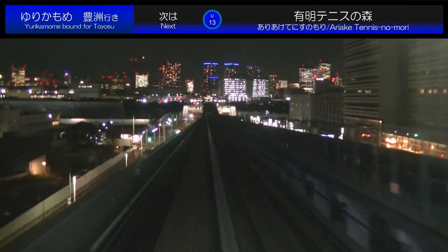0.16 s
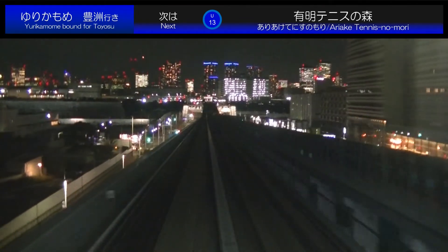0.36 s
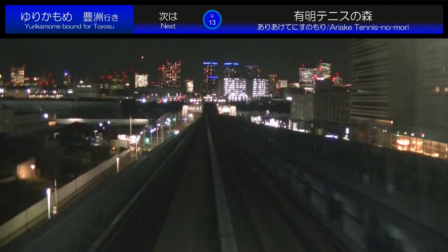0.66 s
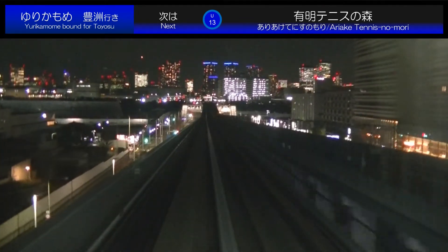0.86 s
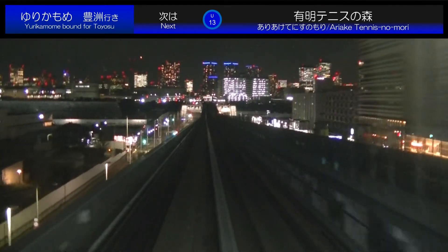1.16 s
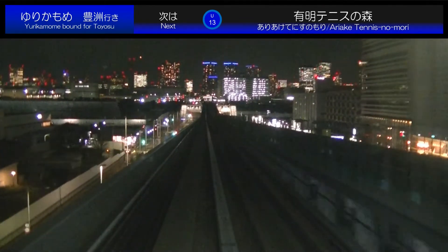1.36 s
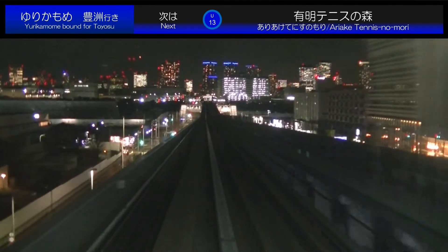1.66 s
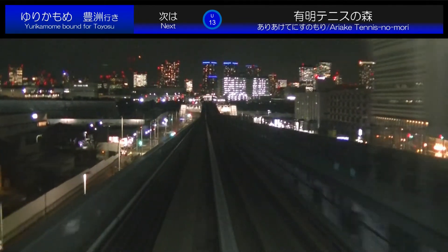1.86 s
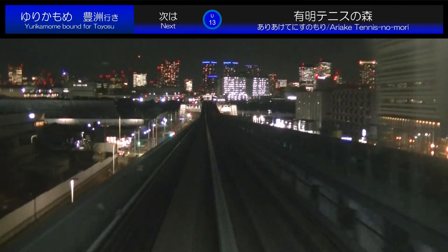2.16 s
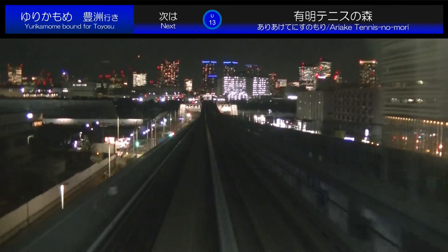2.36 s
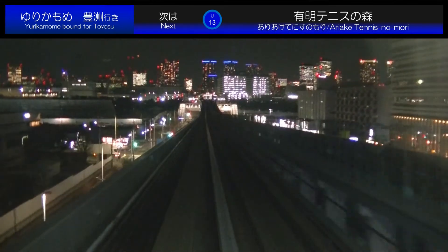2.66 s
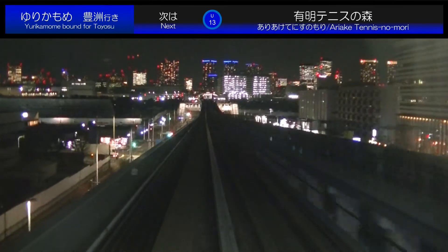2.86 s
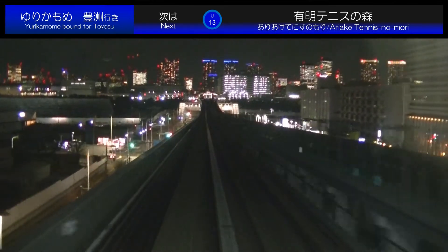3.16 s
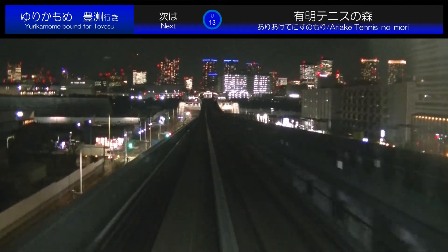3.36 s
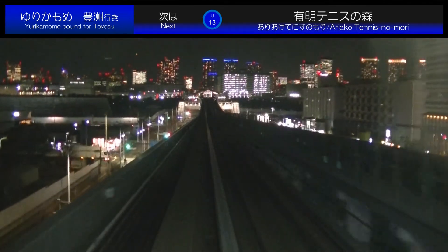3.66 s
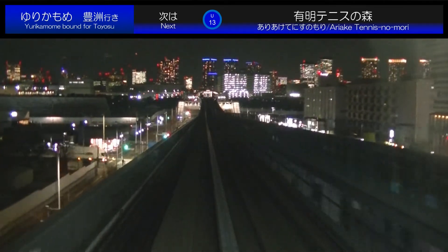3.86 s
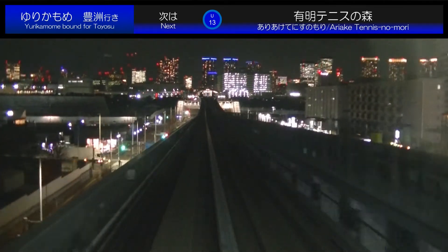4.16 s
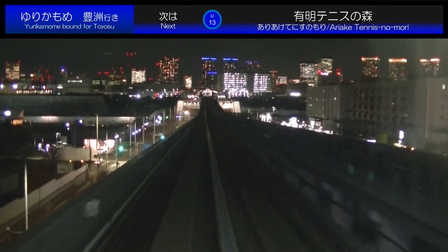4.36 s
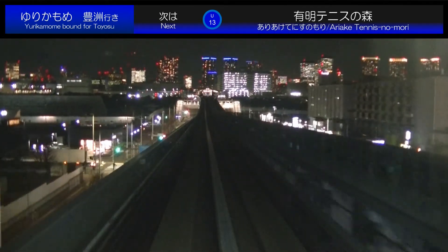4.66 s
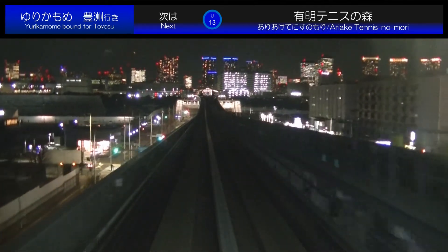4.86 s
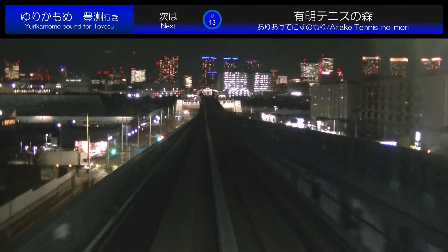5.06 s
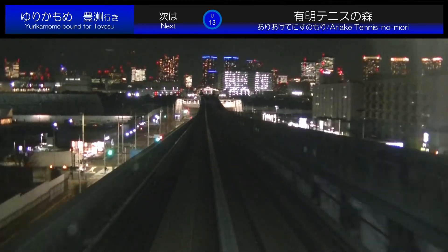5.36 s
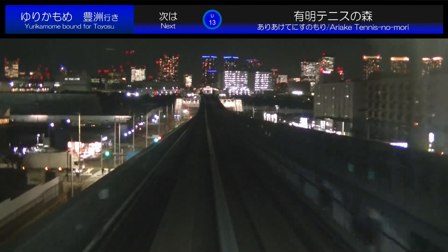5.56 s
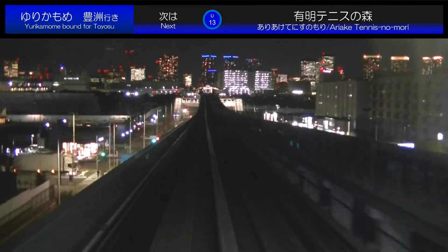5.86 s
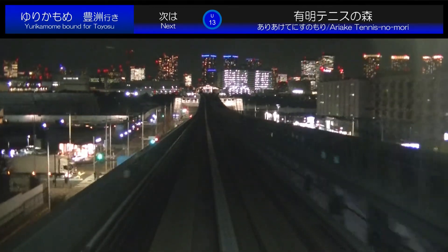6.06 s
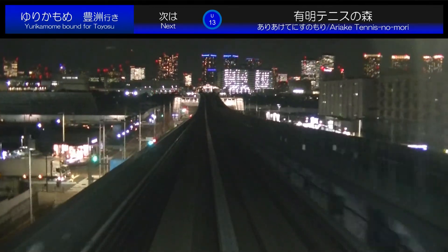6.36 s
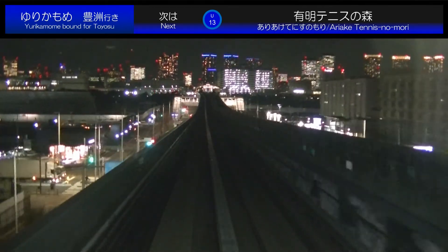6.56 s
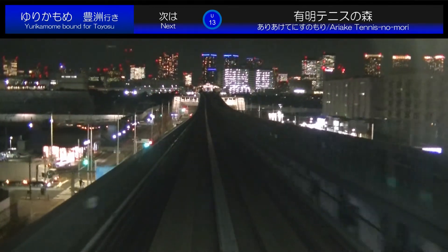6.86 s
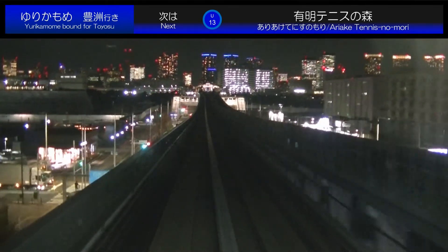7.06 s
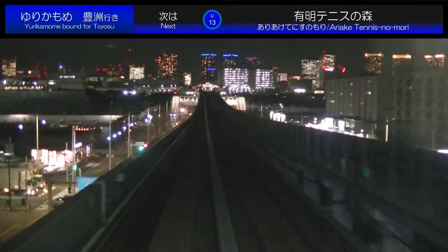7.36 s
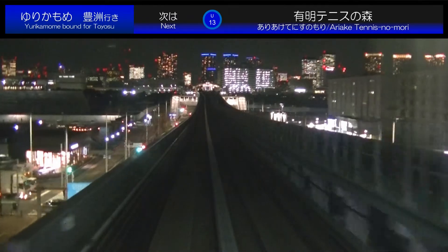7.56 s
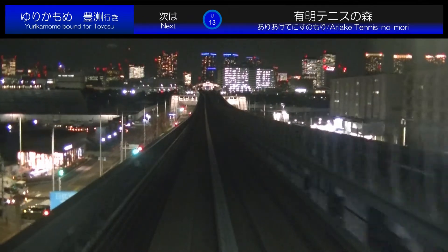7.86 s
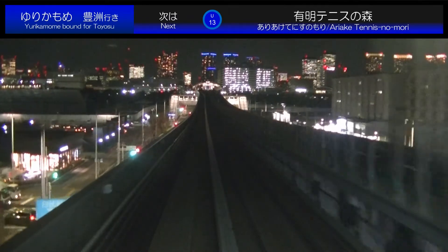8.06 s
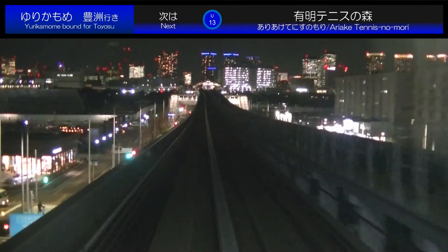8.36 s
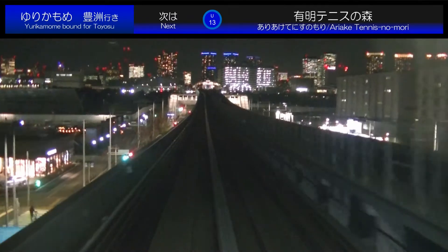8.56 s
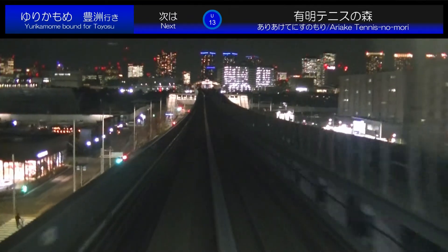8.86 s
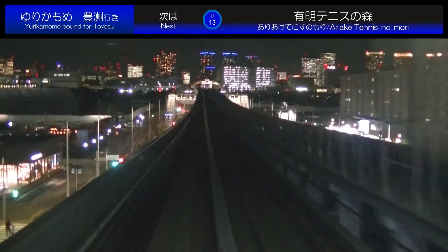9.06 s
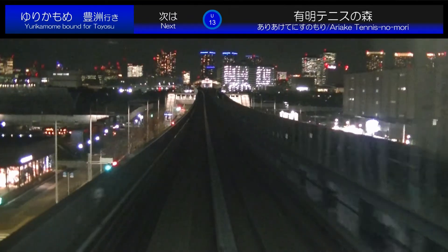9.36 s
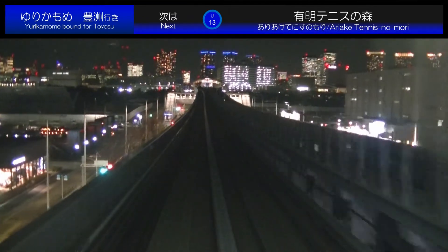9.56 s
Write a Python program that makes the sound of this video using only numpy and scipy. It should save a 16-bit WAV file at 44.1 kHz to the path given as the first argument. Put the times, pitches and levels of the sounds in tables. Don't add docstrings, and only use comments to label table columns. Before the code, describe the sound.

Inside a rubber-tyred train at cruising speed, a wavering mid-pitched gear whine rides over booming, roaring tyre noise, with a dull slab thud.

```python
import sys
import numpy as np
from scipy import signal
from scipy.io import wavfile
from scipy.ndimage import uniform_filter1d

SR = 44100
rng = np.random.default_rng(int(sys.argv[2]) if len(sys.argv) > 2 else 0)


def dump(signal):
    limited = np.clip(np.atleast_2d(signal).T, -1, 1)
    pcm = np.round(limited * 32767).astype(np.int16)
    wavfile.write(sys.argv[1], SR, pcm)


def level_to_linear(level):
    exponent = np.asarray(level, float) / 20
    return 10 ** exponent


N = 428652


def evened(x):
    return x / np.sqrt(np.mean(np.abs(x) ** 2) + 1e-20)


def read_spectrum(points, hz):
    f, value = np.transpose(points)
    return np.interp(np.log(hz + 1), np.log(f + 1), value)


def columns(rows, t):
    s, *values = np.transpose(rows)
    return [np.interp(t, s, v) for v in values]


def humps(t, times, lengths, heights):
    return sum(h * np.exp(-4 * ((t - s) / w) ** 2) for s, w, h in np.broadcast(times, lengths, heights))


def drift(t, top_hz):
    coarse = np.linspace(t[0], t[-1], num=2000)
    total = 0
    for f in np.geomspace(top_hz / 12, top_hz, num=24):
        total = total + np.sin(2 * np.pi * (f * coarse + rng.random())) / np.sqrt(f)
    return np.interp(t, coarse, evened(total))


def tone(t, hz, db, waver_hz, fuzz):
    turns = np.cumsum(hz + waver_hz * drift(t, 30)) / SR
    shake = (1 + fuzz * (drift(t, 45) + 1j * drift(t, 45))) / np.sqrt(1 + 2 * fuzz ** 2)
    return np.sqrt(2) * level_to_linear(db) * (shake * np.exp(2j * np.pi * turns)).imag


def lean_left(db):
    return level_to_linear(np.array([[db], [-db]]))


# time in seconds, gear whine pitch in Hz, whine level in dB, slack of the load from 0 to 1.
MOTOR_PULL = [(0, 400, -11, .05), (.5, 416, -15, 0.2), (1, 427.1, -16.5, 0.3), (1.3, 434, -19, .15),
              (1.6, 432, -18, .25), (2, 437.7, -23, 0.5), (2.7, 446.2, -18.5, .35), (3.3, 446.2, -25, 0.7),
              (4.1, 448, -25.5, .8), (4.4, 418.1, -19, .8), (4.62, 453, -17.5, .5), (5.7, 447.5, -20, 0.6),
              (6.5, 449.5, -16.5, 0.3), (7, 450.7, -20, 0.9), (7.6, 445.7, -15, 0.5),
              (8.1, 450.2, -18.5, 0.9), (9, 445.3, -18.5, .3), (9.72, 445, -14.5, 0.4)]
# time in seconds, length in seconds, drop of the whine in dB.
TEETH_APART = [(0.105, 0.091, 8.5), (0.362, 0.087, 2.5), (1.37, 0.11, 6.5), (1.75, 0.31, 7),
               (2.166, 0.18, 24), (2.509, 0.19, 29), (3.007, 0.16, 9), (3.299, .1, 10), (3.74, 0.22, 10),
               (4.133, 0.16, 21), (4.504, 0.19, 14), (5.065, 0.25, 3), (5.42, 0.1, 6.5), (5.82, .16, 8),
               (6.157, .16, 8), (6.428, 0.096, 13), (6.7, .16, 6.5), (7.199, 0.11, 31), (7.4, 0.06, 7),
               (7.804, 0.21, 6.5), (8.07, 0.12, 8.5), (8.398, 0.078, 16), (8.6, 0.14, 5), (8.944, 0.059, 8),
               (9.27, 0.33, 7.5), (9.604, .12, 20)]


def drive(t):
    mesh_hz, load_db, slack = columns(MOTOR_PULL, t)
    slack, slow = np.clip(slack, 0, 1), t[::64]
    mesh_db = load_db - np.interp(t, slow, humps(slow, *np.transpose(TEETH_APART)))
    mesh = tone(t, mesh_hz, mesh_db, waver_hz=8 * slack, fuzz=.62 * slack)

    ease_s, ease_length_s = 2.6, 0.42
    pull_db, coast_db = -27.5, -33.5
    pulling = np.clip((ease_s - t) / ease_length_s, 0, 1)
    hub_db = coast_db + (pull_db - coast_db) * pulling
    hub_per_mesh = .489 + .013 * np.minimum(t / ease_s, 1)
    hub = tone(t, mesh_hz * hub_per_mesh, hub_db, waver_hz=2.0 * slack, fuzz=0.5 * slack + 0.077)

    slot_db = np.maximum(-35 - 4 * t, -61)
    slots = tone(t, mesh_hz * 2.675, slot_db, waver_hz=1.4, fuzz=0.59)

    power_off_s, fade_db_per_s = 1.8, 14
    switch_db = -48 - fade_db_per_s * np.maximum(t - power_off_s, 0)
    inverter = tone(t, 3301, switch_db - 4.5, waver_hz=7, fuzz=.5)
    return mesh * lean_left(.15) + hub * lean_left(.9) + slots * lean_left(1.5) + inverter


# frequency in Hz, likeness from 0 to 1.
SIDE_LIKENESS = [(30, .97), (100, .995), (300, .998), (700, .99), (1000, .97), (1300, .89), (1500, .56),
                 (1900, .6), (2300, .8), (2800, .73), (3300, .54), (4700, .38), (6900, .3), (9000, .05)]
# frequency in Hz, left over right in dB.
SIDE_BALANCE = [(60, .5), (300, 0.55), (800, -0.9), (1500, 0.5), (1800, 1.3), (2170, -3), (2800, -0.7),
                (3200, -1.8), (4100, -0.4), (6700, 4), (7800, 2.5), (8900, -8), (11500, -8)]
# frequency in Hz, lead of the left in radians.
SIDE_LEAD = [(900, 0), (1550, -0.24), (1950, -.1), (2300, .17), (2800, -0.035), (4100, 0.21), (7000, 0.23)]


def wash(shape_db, level_db, band, patchy_db, flicker_db, size, count):
    hop, hz = size // 4, np.fft.rfftfreq(size, 1 / SR)[:count]
    t = np.arange(N // hop + 5) * hop / SR
    a, b, c, d, patches = rng.standard_normal((len(t), count, 5)).T
    for axis in (0, 1):
        patches = uniform_filter1d(patches, size=9, axis=axis)
    patches = evened(patches)

    same = np.clip(read_spectrum(SIDE_LIKENESS, hz), -1, 1)[:, None]
    left = a + 1j * b
    right = same * left + np.sqrt(1 - same ** 2) * (c + 1j * d)
    right = right * np.exp(-1j * read_spectrum(SIDE_LEAD, hz))[:, None]
    lean = read_spectrum(SIDE_BALANCE, hz)[:, None] / 2

    field_db = shape_db(hz)[:, None] + patchy_db * patches + flicker_db * drift(t, 24)
    z = np.zeros((2, size // 2 + 1, len(t)), complex)
    z[:, :count] = np.array([left * level_to_linear(lean), right * level_to_linear(-lean)]) * level_to_linear(field_db)
    power = (abs(z[:, :count]) ** 2).sum((0, 2))
    share = power[(hz > band[0]) & (hz < band[1])].sum() / power.sum()
    noise = signal.istft(z, nperseg=size, noverlap=size - hop)[1][:, :N]
    return level_to_linear(level_db) * evened(noise) / np.sqrt(share)


# frequency in Hz, width in Hz, lift in dB.
BODY_RESONANCES = [(167, 18, 4.5), (206.7, 12, 8.5), (259.6, 19, 8), (337.7, 11, 7), (373, 27, 4),
                   (634, 13, 1.5), (798, 29, 4), (1648, 80, 4.5)]


def panels_db(hz):
    return sum(db / (1 + (2 * (hz - f) / width) ** 2) for f, width, db in BODY_RESONANCES)


# frequency in Hz, level in dB per Hz.
BOOM_COLOUR = [(8.8, -33.5), (15, -7.5), (43, -4.5), (57, -7), (70, 3), (83, 1.5), (103, -11), (144, -3),
               (157, 2), (176, -12), (190, 4), (250, -27.5), (420, -120)]
DRUM_COLOUR = [(65, -43.5), (110, -22), (145, -7), (178, -19.5), (210, -8), (257, -4), (285, -2.5),
               (344, 0), (395, -5.5), (510, -23), (870, -120)]
ROAR_COLOUR = [(280, -34), (470, 1), (482, -19), (517, -9), (558, -7), (687, -6), (921, -8), (1120, -12.5),
               (1220, -14), (1470, -24), (1670, -23), (2480, -28), (3000, -35.5), (3690, -43),
               (4800, -71.5), (8120, -120)]
TREAD_COLOUR = [(1300, -30.5), (1800, -4), (2250, 0), (2700, -3.5), (3300, -10.5), (4200, -18),
                (6000, -40.5)]
HISS_COLOUR = [(2500, -38.5), (3300, 1), (3700, 0), (4200, -3), (4700, -4.5), (5400, -4.5), (6100, -6.5),
               (6900, -8), (7800, -13), (8900, -17), (10100, -21), (11500, -21), (14000, -37)]
# time in seconds, coarseness of the concrete in dB, rush of air past the walls in dB.
GUIDEWAY = [(0, -1.5, 0.5), (1.3, -1, 1.5), (2, .5, 1), (3.8, 0.7, 0), (4.8, 0.3, -1), (5.7, 0, 1),
            (6.3, 0, -0.5), (7.6, 1.3, -1.5), (8, -2, 0.5), (8.6, -1, 2), (9, -0.5, -1.5),
            (9.72, -.5, -0.5)]
# time in seconds, lift of drumming in dB, lift of boom in dB.
SLAB_BUMPS = [(.1, 6.5, 0.5), (.45, -4.5, -2.5), (.72, -3, 7.5), (.98, 3, 1), (1.2, 3, 0.5),
              (1.38, 4.5, 5.5), (1.7, 3.5, 1.5), (1.86, -5, 5), (2.33, 2.5, 3), (2.53, -3, 3.5),
              (2.82, 3, 4), (3.24, 6.5, 6), (3.63, 0.5, 5), (3.91, 6, -2), (4.23, 6.5, 3.5), (4.53, 5.5, 3),
              (5.3, 2.5, -1), (5.92, 0.5, 4), (6.18, 5.5, 5.5), (7.38, 2, 7), (7.52, -7, -2), (7.86, 4, 3),
              (7.98, 1.5, 0.5), (8.139, 1.5, 9), (8.299, -1.5, 8.5), (8.97, 4.5, 5), (9.34, 8.5, 3),
              (9.6, 1, -1)]


def road(t):
    slow = t[::64]
    cruise_hz, bump_s = 448, 0.12
    speed = 100 * (columns(MOTOR_PULL, slow)[0] / cruise_hz - 1)
    coarseness_db = columns(GUIDEWAY, slow)[0]
    rush_db = columns(GUIDEWAY, t)[1]
    s, drum_lift, boom_lift = np.transpose(SLAB_BUMPS)

    def layer_db(cruise_db, db_per_speed, surface_share, lift_db=0):
        level = cruise_db + db_per_speed * speed + surface_share * coarseness_db + lift_db
        return np.interp(t, slow, level)

    boom_db = layer_db(-35.5, .3, 0, humps(slow, s, bump_s, boom_lift))
    drum_db = layer_db(-23, .2, 0.084, humps(slow, s, bump_s, drum_lift))
    roar_db = layer_db(-20, 0.22, 1)
    hiss_db = layer_db(-51, 0.044, 0.22)

    boom = wash(lambda hz: read_spectrum(BOOM_COLOUR, hz), boom_db, (20, 110),
                patchy_db=-0.8, flicker_db=0.0, size=4096, count=40)
    drum = wash(lambda hz: read_spectrum(DRUM_COLOUR, hz) + panels_db(hz), drum_db, (230, 385),
                patchy_db=1.8, flicker_db=0.16, size=4096, count=80)
    roar = wash(lambda hz: read_spectrum(ROAR_COLOUR, hz) + panels_db(hz), roar_db, (500, 1400),
                patchy_db=0.7, flicker_db=0.48, size=1024, count=150)
    tread = wash(lambda hz: read_spectrum(TREAD_COLOUR, hz), -40.5 + 0.89 * rush_db, (1500, 4000),
                 patchy_db=2.0, flicker_db=1.5, size=512, count=66)
    hiss = wash(lambda hz: read_spectrum(HISS_COLOUR, hz), hiss_db, (4500, 9000),
                patchy_db=1.1, flicker_db=0.9, size=512, count=170)
    return boom + drum + roar + tread + hiss * level_to_linear(rush_db)


# time in seconds, peak level in dB.
GUIDEWAY_GAPS = [
    (1.678, -1),
    (7.839, -6),
    (7.869, -6.5),
]


def joints():
    t, blows = np.arange(6000) / SR, np.zeros(N + SR)
    for s, db in GUIDEWAY_GAPS:
        fade_db = -60 * t / 0.077
        blows[round(s * SR):][:len(t)] += level_to_linear(db + 5 + fade_db) * rng.standard_normal(len(t))
    floor = signal.butter(4, [200, 900], "band", fs=SR, output="sos")
    return signal.sosfilt(floor, blows[:N]) * lean_left(-.6)


# time in seconds, peak in dB, ring in Hz, left over right in dB, share of ring from 0 to 1.
TRIM_RATTLES = [(.318, -47, 5200, 2, .3), (1.205, -45, 6200, 0, .3), (1.352, -49, 6500, 1, .3),
                (2.134, -47, 6500, 1, .3), (2.88, -48, 6800, 0, .3), (4.846, -47, 6090, 0, .9),
                (7.496, -36, 5650, -.5, .45), (7.815, -45, 6900, 1.5, .3), (7.96, -46, 7200, 1.5, .3),
                (8.1, -46, 6700, 2, .3), (8.32, -45, 7400, 2, .35), (8.509, -44, 6900, 1.5, .4),
                (8.57, -47, 6900, 1.5, .3), (8.669, -47, 7400, 2, .3)]


def trim():
    out, t = np.zeros((2, N + SR)), np.arange(4410) / SR
    shape = (1 - np.exp(-t / .003)) * level_to_linear(-60 * t / .2)
    for s, db, hz, pan_db, share in TRIM_RATTLES:
        noise = rng.standard_normal((2, len(t)))
        around = signal.butter(4, [.86 * hz, 1.3 * hz], "band", fs=SR, output="sos")
        chatter = signal.sosfilt(around, noise)
        b, a = signal.iirpeak(hz, hz / 600, fs=SR)
        ring = signal.lfilter(b, a, signal.lfilter(b, a, noise))
        mix = share * evened(ring) + (1 - share) * evened(chatter)
        at = round(s * SR)
        out[:, at:at + len(t)] += level_to_linear(db + .5) * lean_left(pan_db / 2) * shape * mix
    return out[:, :N]


def scene():
    t = np.arange(N) / SR
    return drive(t) + road(t) + joints() + trim()


# time in seconds, length in seconds, loss of bandwidth in Hz (below
TREBLE_LOSSES = [(0.24, 0.057, 1497), (.41, 0.033, 1500), (.52, .04, 1498), (0.79, 0.14, 2304),
                 (1.33, 0.047, 1806), (1.56, 0.041, 1502), (2.781, .08, 600), (4.8, .05, 2006),
                 (5.19, .04, 1503), (6.019, .07, 1800), (6.199, .4, 700), (6.598, 0.12, 1498),
                 (6.874, 0.037, 1502.5), (7.72, .09, 2400), (7.523, 0.069, -1500), (8.781, .06, 1501.5),
                 (9.44, .06, 2500), (1.9, .3, -900), (5.8, 0.32, -700), (8.301, .6, -500)]


def drop_treble(x):
    hz, t, z = signal.stft(x, SR, nperseg=1024, noverlap=768)
    band = (hz // 130).astype(int)
    luck = rng.standard_normal((len(t) // 4 + 1, 172))
    luck[:, :-1] = evened(luck + np.roll(luck, 1, axis=0))[:, :-1]
    luck = luck.repeat(4, axis=0)[:len(t)].T
    loud_db = 10 * np.log10(uniform_filter1d((abs(z) ** 2).sum((0, 1)), size=8) + 1e-12)
    over_db = np.clip(loud_db - np.median(loud_db), -3, 5)
    edge_hz = 9280 - 199.5 * over_db + 300 * drift(t, 6)
    edge_hz = edge_hz - humps(t, *np.transpose(TREBLE_LOSSES))
    edge_hz = edge_hz + 580 * luck[-1] + 650 * luck[band]
    kept = z * (hz[:, None] < edge_hz)
    return signal.istft(kept, SR, nperseg=1024, noverlap=768)[1][:, :N]


def roll_off(x):
    return signal.sosfilt(signal.butter(12, 12900, fs=SR, output="sos"), x)


def record(dry):
    ending = np.minimum(np.arange(N)[::-1] / 60, 1)
    limited = 1.3 * np.tanh(dry / 1.3)
    return roll_off(drop_treble(limited * ending))


dry = scene()
out = record(dry)
dump(out)
```